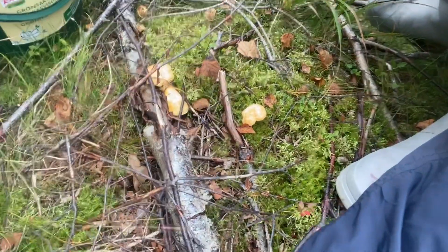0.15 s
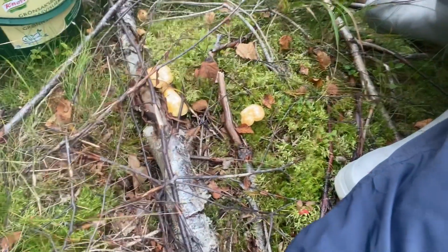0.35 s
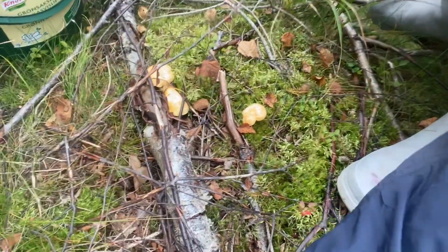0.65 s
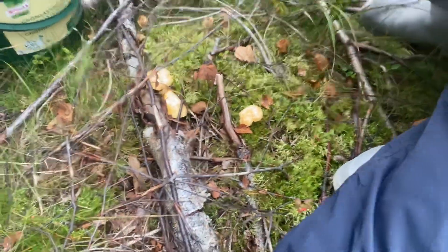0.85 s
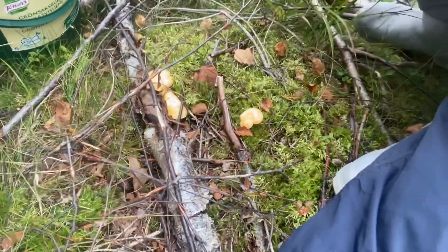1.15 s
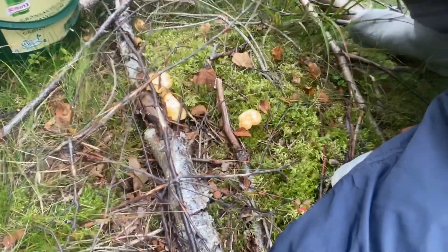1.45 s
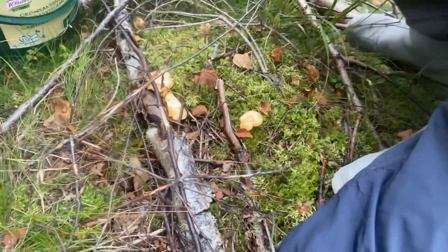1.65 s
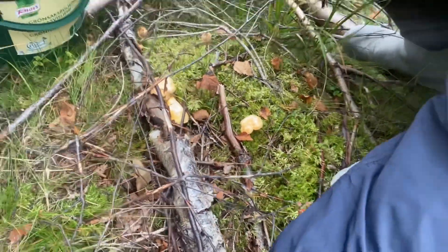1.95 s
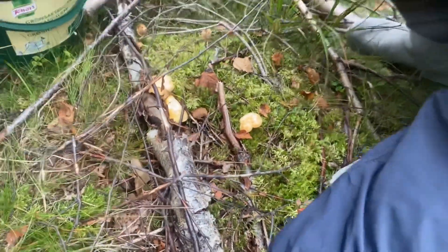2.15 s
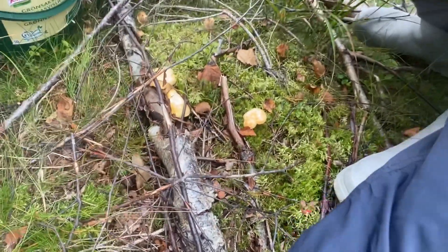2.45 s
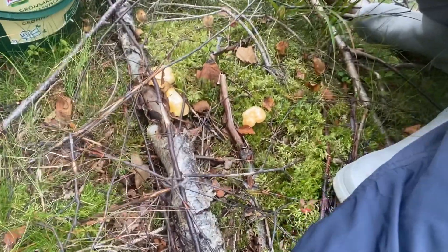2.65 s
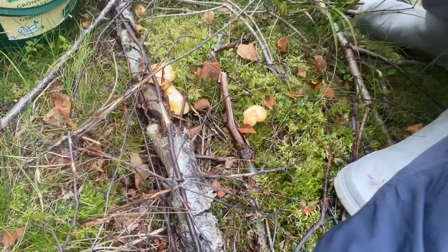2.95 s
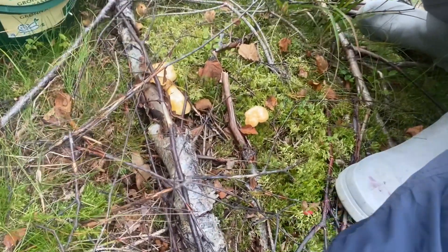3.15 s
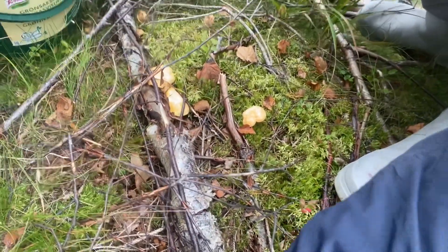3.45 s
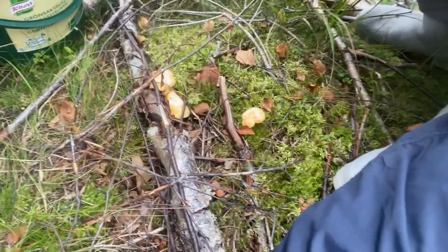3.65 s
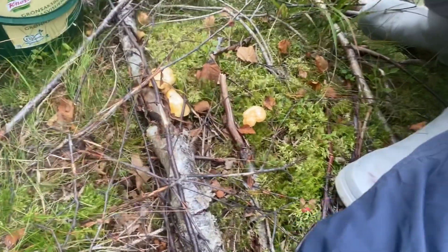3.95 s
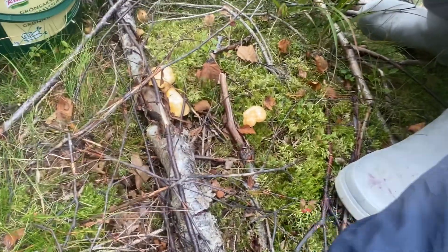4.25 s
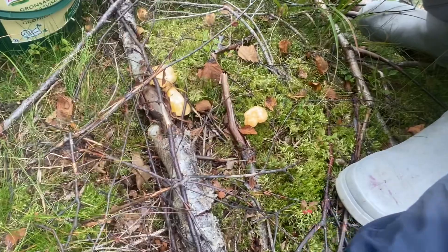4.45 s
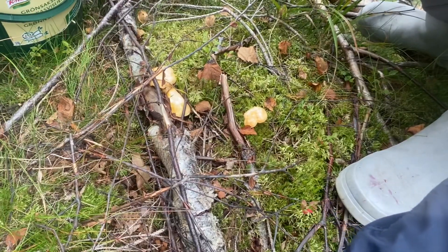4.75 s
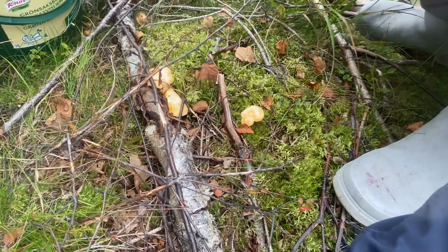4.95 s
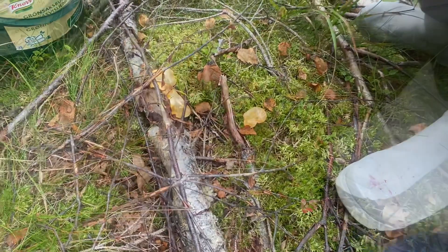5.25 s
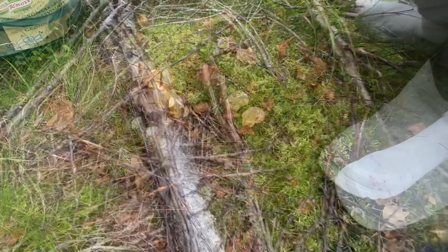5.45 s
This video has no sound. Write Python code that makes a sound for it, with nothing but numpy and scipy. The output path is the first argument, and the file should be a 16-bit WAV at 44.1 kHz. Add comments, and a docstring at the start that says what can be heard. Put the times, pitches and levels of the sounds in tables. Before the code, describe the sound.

Dry twigs snap and leaf litter rustles close by on a forest floor, with a tiny metal tinkle and soft low handling rumble.

```python
"""Twigs snap, dry litter and cloth rustle, a small metal tag tinkles, something taut creaks, and lows rumble.
The place is a mossy forest floor; someone crouches beside a hand-held stereo recorder with two microphone ports.
Shaped noise makes rustle, brushes, rumble and cracks; decaying sines make tag and creaks; thuds fall in pitch.
The ports hear each sound with a lag that changes with pitch."""
import sys
import numpy as np
from scipy import signal
from scipy.fft import rfft, irfft
from scipy.io import wavfile
from scipy.ndimage import uniform_filter1d

SR = 44100
rng = np.random.default_rng(int(sys.argv[2]) if len(sys.argv) > 2 else 0)


def store_wav(level_fs):
    """Save 16-bit WAV to argv[1]."""
    pcm = np.round(np.clip(np.atleast_2d(level_fs), -1, 1) * 32767)
    wavfile.write(sys.argv[1], SR, pcm.T.astype(np.int16))


N = 247296
TIME = np.arange(N) / SR
FREQ = np.fft.rfftfreq(N, 1 / SR)

# Breeze under the jolts, before gusts: (time [s], level [dB])
BREEZE = [(0, -56.5), (1.2, -50), (1.7, -67), (1.85, -68), (3.1, -67), (4.2, -69.5), (4.9, -56.5),
          (5.61, -69)]
BREEZE_GUST_DB = 3.5  # spread of the random gusts
# Jolts of the hand on the recorder: (time of height [s], level [dB], length [s])
JOLTS = [(0.33, -38.5, 0.041), (0.5, -42.5, 0.014), (0.66, -53, 0.055), (0.86, -38, 0.08),
         (1.1, -43.5, 0.16), (1.31, -35, 0.025), (1.45, -41, 0.04), (1.57, -38, 0.11), (1.68, -29.5, 0.015),
         (1.78, -40, 0.012), (2.51, -56.5, 0.074), (2.94, -50.5, 0.02), (3.23, -54.5, 0.037),
         (3.65, -61, 0.029), (3.81, -49.5, 0.034), (4.04, -53.5, 0.042), (4.29, -59, 0.061),
         (4.45, -38.5, 0.027), (4.68, -50, 0.028), (4.75, -48, 0.016), (4.84, -49, 0.058),
         (5.03, -50.5, 0.061), (5.24, -60, 0.038)]
JOLT_RISE_DB, JOLT_FALL_DB = 9.5, 13  # change within one length before and after the height

# Quiet litter between stirs: (time [s], crisp top [dB], scrape [dB], dull body [dB])
LITTER = [(0, -68, -64, -67.5), (1.3, -72, -76.5, -64.5), (1.8, -70.5, -70, -67),
          (2.798, -76.5, -75.5, -72.5), (3.899, -78, -91.5, -71.5), (4.399, -72.5, -69, -73.5),
          (4.569, -83.5, -90, -71), (5, -73.5, -86.5, -67.5), (5.61, -76, -68.5, -71)]
# Stirs of foot and cloth: (time of height [s], crisp top [dB], length [s], scrape relative to top [dB])
STIRS = [(0.0, -56.5, 0.11, 0.5), (0.124, -49, 0.096, -11.5), (0.247, -53.5, 0.082, -8.5),
         (0.48, -56.5, .1, -1.5), (0.667, -53, .1, -3.5), (0.804, -52.5, .1, -4.5),
         (1.058, -56.5, 0.13, 0.5), (1.226, -55.5, 0.083, -3.5), (1.466, -52, .1, 0.5),
         (1.653, -45.5, 0.057, -9.5), (1.777, -56.5, .07, -5), (2.147, -58, .18, -5.5),
         (2.485, -67, 0.15, 0.5), (3.127, -64.5, .25, -3.5), (3.318, -59.5, .06, -9.5),
         (3.467, -60.5, 0.1, -1.5), (3.754, -65, 0.12, -7), (3.994, -62.5, 0.082, -5.5),
         (4.262, -65, .16, -9), (4.432, -58, 0.036, -3.5), (4.723, -64, .11, -4), (5.061, -71, 0.17, 8.5)]
STIR_RISE_DB, STIR_FALL_DB = 12.5, 12.5  # change within one length before and after the height
STIR_BODY_DB = -5  # body relative to top
# Rustle colour before its bands are levelled: (frequency [Hz], relative density [dB])
RUSTLE_COLOUR = [(120, 7), (300, 10.5), (700, 8), (1200, 0.5), (3200, 0.5), (5500, 2), (9000, 5.5),
                 (12500, 3), (15500, 5), (16200, -42)]
# Bands of top, scrape and body, in that order: (low edge [Hz], high edge [Hz])
RUSTLE_BANDS = [(6400, 10500), (1800, 4200), (250, 650)]
# Leaves brushed aside: (time of height [s], level [dB], length [s], nominal centre [Hz])
BRUSHES = [(0.24, -53, 0.017, 964), (1.23, -57, 0.026, 1620), (2.172, -50, .005, 3320),
           (2.514, -54, 0.0099, 1740), (2.517, -63, 0.041, 895), (3.096, -54, 0.044, 5340),
           (4.658, -64, 0.04, 3100), (4.725, -60, 0.036, 3250)]

# Slips of a taut fibre: (time [s], level [dB])
CREAK_SLIPS = [(1.235, -47.5), (1.263, -53), (1.34, -48.5), (1.364, -49), (1.392, -48.5), (1.424, -48),
               (1.447, -49), (1.467, -52), (1.492, -51), (1.524, -50), (1.591, -51), (1.631, -47.5),
               (1.656, -45), (1.707, -49), (1.738, -56), (1.803, -52), (2.005, -58.5), (2.036, -57)]

# Touches of the tag: (time [s], level of each of five low rings [dB] in five columns,
# base level of the high rings [dB], time until cloth damps them [ms])
TAG_TOUCHES = [(0.482, -72, -67, -57, -67, -47.5, -65, 9.2), (0.6158, -39.5, -43, -41, -57, -54, -58, 14),
               (1.316, -50, -53, -65, -63, -61, -73, 3), (1.3717, -46, -61, -63, -70, -65, -66, 12),
               (1.4293, -40.5, -55, -61, -50, -52, -50, 14), (1.46, -57, -60, -66, -54, -58, -68, 18),
               (2.0362, -41.5, -54, -52, -53, -52, -57, 18), (2.054, -58, -59, -47, -57, -50, -55, 28),
               (2.076, -51, -39, -42, -50, -40.5, -63, 12), (2.1125, -42, -47, -38, -48, -48, -47.5, 7.9),
               (2.128, -45.5, -47, -54, -48, -57, -55, 11), (2.143, -49, -56, -56, -54, -49, -54, 37),
               (2.1695, -54, -50, -60, -47, -49.5, -56, 26), (2.2474, -60, -63, -46, -67, -70, -63, 23),
               (2.277, -51, -48, -49, -56, -56, -61, 16), (2.357, -46.5, -49, -66, -75, -75, -71, 5.3),
               (3.0224, -51, -45, -59, -62, -54, -73, 15), (3.043, -61, -57, -52, -43, -42, -58, 13),
               (3.0808, -46, -53, -55, -45, -45, -54, 22), (3.106, -58, -59, -59, -51, -60, -58, 15),
               (3.1217, -48.5, -59, -55, -58, -56, -58.5, 37), (3.147, -60, -63, -50, -60, -56, -56, 42),
               (3.188, -47, -69, -56, -64, -55, -61, 19), (3.217, -38, -46, -56, -53, -55, -58, 5.2),
               (3.228, -61, -57, -61, -53, -48, -60, 25), (3.2518, -30.5, -46, -53, -30, -49, -50, 18),
               (3.279, -32, -40, -46, -56, -59, -59, 8.6), (3.296, -30, -51, -57, -57, -56, -47.5, 11.6),
               (3.322, -35, -55, -60, -67, -63, -51, 8.5), (3.369, -46.5, -50, -60, -74, -79, -73, 5.3),
               (3.39, -48, -49, -62, -73, -74, -73, 5.6), (3.469, -56, -57, -72, -75, -64, -66, 13),
               (3.6165, -40.5, -45, -52, -73, -77, -84, 10.3), (3.707, -49, -61, -53, -59, -69, -72, 15),
               (3.7223, -39, -58, -55, -64, -52.5, -62.5, 9.8),
               (3.785, -37.5, -49, -62, -71, -67, -74, 6.1),
               (3.831, -53, -58, -49.5, -58, -59.5, -64.5, 13.5),
               (4.595, -74, -75, -72, -75, -55.5, -82, 6.6), (5.141, -65, -60, -70, -84, -87, -64, 17),
               (5.372, -71, -70, -82, -78, -65, -83, 12), (5.469, -59, -71, -76, -86, -84, -79, 7.6)]
# Free rings of the tag: (frequency [Hz], 60 dB decay [s])
TAG_RINGS = [(4592, 0.39), (4728, 0.21), (4895, 0.15), (5832, 0.049), (5946, 0.14), (11010, 0.082),
             (12700, 0.25), (13900, 0.12)]
TICK_DB, TICK_S = -7, 0.0025  # contact noise relative to the loudest ring, before its band; its decay
CHATTER_DB = -3  # gain of the faint touches
CHATTER_LIFT_DB = 11  # lift of chatter rings above 5400 Hz

# Twigs: (time [s], nominal crack [dB], wood relative to crack before a common lift [dB], wood pitch [Hz],
# nominal thud relative to crack [dB], length [ms])
TWIGS = [(0.0495, -25.5, -23, 2900, -24, 2.9), (0.118, -42, -22, 3000, -35, 1),
         (0.1404, -24, -39, 3260, -50, 1.2), (0.159, -37, -19, 3750, -18, 1.1),
         (0.2563, -12.5, -15.5, 1980, -26.5, 3.1), (0.2937, -40.5, -17, 2500, -14, 1.5),
         (0.3196, -36.5, -16, 1190, -23, 5.6), (0.3515, -40.5, -13, 1650, -29, 2.3),
         (0.543, -37, -21, 4000, -35, 2.2), (0.641, -43, -7, 3000, -30, 1),
         (0.6621, -21.5, -11, 4050, -40, 5.3), (0.7278, -25, -18, 3650, -51, 1.1),
         (0.7947, -23, -13, 1790, -29, 1.9), (0.8097, -23.5, -19, 2040, -23.5, 1.7),
         (0.8759, -38, -12, 2440, -28, 2), (0.901, -38.5, -21, 3500, -33, 1.5),
         (1.006, -31.5, -12, 2270, -23, 3), (1.0616, -19, -18, 3870, -49, 3.4),
         (1.0687, -30.5, -25, 3490, -43, 2.8), (1.5937, -31, -16, 1490, -19, 0.37),
         (1.6019, -29, -16.5, 3700, -23, 6.7), (1.6476, -35.5, -7, 3300, -11.5, 2.9),
         (1.6557, -25.5, -5, 3800, -21, 1.6), (1.714, -37, -13.5, 4050, -20, 1.8),
         (2.0319, -38, -13, 3880, -24.5, 5.6), (2.1383, -31.5, -35, 3560, -39, 1.1),
         (2.4716, -27.5, -18.5, 1470, -26, 0.59), (2.6653, -32.5, -14, 3960, -22.5, 4),
         (2.98, -39, -9.5, 1830, -19.5, 1.6), (3.3178, -31, -42, 4120, -19.5, 1.5),
         (3.3507, -39.5, -20, 4060, -25, 1.7), (3.46, -39.5, -15, 1720, -24, 1.2),
         (3.7371, -45, -2.5, 3500, -20, 1.1), (3.9773, -39, -9, 3540, -17, 7.3),
         (4.0174, -25, -13, 4100, -26, 2.7), (4.1754, -38, -13, 2880, -7.5, 4.3),
         (4.231, -50, -7, 3300, -30, 2.5), (4.2547, -27.5, -16, 2600, -21.5, 3),
         (4.3819, -52.5, -3.5, 3000, -27, 1.5), (4.4143, -26.5, -12, 3870, -23.5, 3.8),
         (4.4245, -47, -4.5, 3200, -20, 1.2), (4.4317, -44, -2.5, 3760, -17, 1),
         (4.479, -49.5, -8, 2700, -30, 1.5), (4.8941, -41, -13, 3000, -25, 1.5),
         (5.457, -48, -16, 1910, -10, 1.8)]
# Low rings of the limb under each break: (frequency [Hz], gain [dB], 60 dB decay [s])
LIMB_RINGS = [(726, -2.5, 0.38), (866, 17.5, 0.021), (410, 6.5, 0.069)]
WOOD_LIFT_DB = 8.5  # common lift of the wood
SMALL_SNAPS = 150  # faint twigs left to chance
SMALL_OVER_DB, SMALL_WOOD_DB = 3.5, 0.5  # base crack over the rustle, base wood relative to crack
SMALL_THUD_DB, SMALL_MS = -27, 0.95  # thud relative to crack; length
# The twig between these times [s] breaks right in front: its wood reaches the right port samples later.
HEAD_ON_FROM_S, HEAD_ON_TO_S, HEAD_ON_LAG_SAMPLES = .25, .26, 9

# Phase by which the left port leads the right: (frequency [Hz], lead [rad])
PORT_LEAD = [(0, 0), (1000, -.5), (4900, -8.8), (5900, -6.3), (17000, 5.6)]
# Likeness of the noise in the left and right channels: (frequency [Hz], likeness [0-1])
CHANNEL_LIKENESS = [(40, 0.58), (300, 0.56), (700, 0), (2000, 0.11), (6500, 0), (8500, 1), (15000, 1)]
PORT_BALANCE_DB = -1.5  # left relative to right
TOP_HZ = 16900  # upper limit of the recorder


def undb(db):
    """Turn decibels into an amplitude factor."""
    return 10 ** (np.asarray(db) / 20)


def unit(x):
    """Scale to an rms of 1."""
    return x / np.sqrt(np.mean(x ** 2))


def curves(table):
    """Draw each column of a table as a curve over time."""
    s, *columns = np.transpose(table)
    return [np.interp(TIME, s, column) for column in columns]


def over_freq(table):
    """Draw a table over log frequency."""
    hz, value = np.transpose(table)
    return np.interp(np.log(FREQ + 1), np.log(hz + 1), value)


def band(x, lo_hz, hi_hz):
    """Keep one band of the sound."""
    edges = [lo_hz, min(hi_hz, .45 * SR)]
    return signal.sosfilt(signal.butter(2, edges, "bandpass", fs=SR, output="sos"), x)


def ring(x, hz, t60):
    """One decaying mode; a unit impulse rings with an envelope starting near 1."""
    r, w = np.exp(-np.log(1000) / (t60 * SR)), 2 * np.pi * hz / SR
    return signal.lfilter([0, np.sin(w)], [1, -2 * r * np.cos(w), r * r], x)


def decay_sum(x, decay_s):
    """Each impulse leaves an exponential tail."""
    return signal.lfilter([1], [1, -np.exp(-1 / (decay_s * SR))], x)


def walk(rate):
    """Random levels held 1 / rate s and slewed; spread near 1."""
    k = int(SR / rate)
    held = np.repeat(rng.standard_normal(N // k + 1), k)
    return 1.116 * uniform_filter1d(uniform_filter1d(held, k), k)[:N]


def crackle(rate, depth, settle_s=0.0071):
    """Gain that jumps at random cracks of scattered size and settles within milliseconds; rms 1."""
    sizes = undb(2.84 * np.minimum(rng.exponential(size=N), 3.5))
    cracks = (rng.random(N) < rate / SR) * sizes
    return unit(1 + depth * decay_sum(cracks, max(settle_s, .0003)))


def swells(rows, rise_db, fall_db):
    """Power of humps (s, dB, length s) that climb to their height and sink again, straight in dB."""
    humps = []
    for s, db, length in rows:
        drop_db = np.where(TIME < s, rise_db * (s - TIME), fall_db * (TIME - s)) / max(length, .003)
        humps.append(undb(db - drop_db) ** 2)
    return humps


def add(track, s, piece):
    """Lay a piece into a track at a time in seconds."""
    i = int(s * SR)
    n = min(piece.shape[-1], N - i)
    track[..., i:i + n] += piece[..., :n]


def pair(x, other):
    """Two channels of noise with the listed likeness: each mixes a common and an opposite part."""
    like = np.clip(over_freq(CHANNEL_LIKENESS), 0, 1)
    common = rfft(x) * np.sqrt((1 + like) / 2)
    opposite = rfft(other) * np.sqrt((1 - like) / 2)
    return irfft(np.array([common + opposite, common - opposite]), N)


def rumble():
    """Breeze and handling: a low wobble of wandering pitch plus low noise, partly different in the channels."""
    swing = np.exp(2j * np.pi * np.cumsum(59 + 9 * walk(6)) / SR)
    slow = signal.butter(1, 20., fs=SR, output="sos")
    noise = rng.standard_normal((2, N)) + 1j * rng.standard_normal((2, N))
    drift = signal.sosfilt(slow, signal.sosfilt(slow, noise))
    # the fractional power evens out the drifting amplitude a little
    wobble = np.real(swing * drift / np.abs(drift) ** 0.22)
    upper = undb(-12.0) * unit(band(np.imag(noise), 92, 157))
    lower = undb(-7.0) * unit(band(np.real(noise), 35.3, 46.7))
    channels = unit(pair(*band(unit(wobble) + upper + lower, 46, 450)))
    breeze = undb(curves(BREEZE)[0] + BREEZE_GUST_DB * walk(5.9))
    jolt_power = sum(swells(JOLTS, JOLT_RISE_DB, JOLT_FALL_DB))
    return channels * np.sqrt(breeze ** 2 + jolt_power)


def rustle_levels():
    """Levels in dB of top, scrape and body: the quiet litter plus every stir."""
    stirs = np.array(swells([row[:3] for row in STIRS], STIR_RISE_DB, STIR_FALL_DB))
    top = stirs.sum(axis=0)
    scrape = undb(np.array(STIRS)[:, 3]) ** 2 @ stirs
    body = undb(STIR_BODY_DB) ** 2 * top
    return [10 * np.log10(undb(db) ** 2 + power) for db, power in zip(curves(LITTER), (top, scrape, body))]


def rustle():
    """Tiny leaf cracks of scattered size over a cloth hiss, swelling with each movement."""
    colour = undb(over_freq(RUSTLE_COLOUR)) * (FREQ > 100)
    grain = crackle(120, 0.7, 0.0016)
    sources = [irfft(rfft(rng.standard_normal(N) * grain) * colour, N) for _ in range(2)]
    spectrum = rfft(pair(*sources))
    gains_db = []
    for level_db, (lo, hi) in zip(rustle_levels(), RUSTLE_BANDS):
        inside = spectrum[0, (FREQ > lo) & (FREQ < hi)]
        gains_db.append(level_db - 10 * np.log10(2 * np.sum(np.abs(inside) ** 2) / N ** 2))
    top, scrape, body = gains_db
    slice_gains = (body, body, body, (body + scrape) / 2, scrape, (scrape + top) / 2, top)
    out = 0
    # octave slices that sum flat, each flickering and crackling alone, the dull ones less
    for lo, gain_db in zip(120 * 2 ** np.arange(7.), slice_gains):
        crisp = min(lo / 1500, 1) ** 0.41
        octaves_off = np.abs(np.log2(np.clip(FREQ, 170, 10800) / (lo * np.sqrt(2))))
        share = np.clip(1 - octaves_off, 0, 1)
        flicker_db = crisp * (2.36 * walk(20) + 2.72 * walk(7))
        gain = undb(gain_db + flicker_db) * crackle(60, 0.55 * crisp, 0.0022)
        out = out + irfft(spectrum * share, N) * gain
    return out * undb(2.06 * walk(30))


def brushes():
    """Leaves brushed aside: grainy noise swishes, each in a narrow band."""
    out = 0
    for power, (*_, hz) in zip(swells([row[:3] for row in BRUSHES], 12.5, 6.5), BRUSHES):
        grit = rng.standard_normal((2, N)) * crackle(304, 0.66)
        out = out + np.sqrt(power) * unit(band(grit + grit[0], hz / 1.26, hz * 1.104))
    return out


def creaks():
    """Each slip of the fibre swells and dies in a short hollow ring, with a duller one under it."""
    out, t = np.zeros(N), np.arange(1500) / SR
    detunes = 1 + .02 * rng.standard_normal(len(CREAK_SLIPS))
    for (s, db), detune in zip(CREAK_SLIPS, detunes):
        hollow = np.sin(2 * np.pi * 815 * detune * t)
        dull = undb(-6.5) * np.sin(2 * np.pi * 480 * detune * t)
        swell = np.e * t / 0.0028 * np.exp(-t / 0.0025)
        add(out, s - .002, undb(db) * swell * (hollow + dull))
    return out * undb(np.array([[-2.5], [2.5]]))


def chatter(touched):
    """Many faint random touches while the tag rings, too soft for the high rings."""
    touches = (rng.random((5, N)) < 130 / SR) * rng.standard_normal((5, N))
    soft = 0
    for (hz, t60), touch in zip(TAG_RINGS, touches):
        swing = decay_sum(np.abs(band(touched, hz - 400, hz + 400)), 0.014) / (0.01 * SR)
        soft = soft + ring(swing * touch, hz, 0.17 * t60) * undb(CHATTER_LIFT_DB * (hz > 5400))
    return undb(CHATTER_DB) * band(band(soft, 4300, 6300), 4300, 6300)


def tinkles():
    """Each touch strikes the tag's modes in its own mix and chokes the ring before it; cloth then damps it."""
    out, t = np.zeros(N), np.arange(6000) / SR
    chance = rng.standard_normal((len(TAG_TOUCHES), 3, len(TAG_RINGS)))
    hz, t60 = np.transpose(TAG_RINGS)
    ticks = rng.standard_normal((len(TAG_TOUCHES), len(t))) * np.exp(-t / TICK_S)
    for (s, *low_db, high_db, ms), (mix, detune, turn), tick in zip(TAG_TOUCHES, chance, ticks):
        highs_db = high_db + np.array([0, -5, -9]) + 4.5 * mix[5:]
        gains = undb(np.r_[low_db, highs_db])
        mode_hz = hz * (1 + 0.0032 * detune)
        modes = np.sin(2 * np.pi * mode_hz[:, None] * t + 3 * turn[:, None]) * 1000. ** (-t / t60[:, None])
        damping = 0.11 + 1.027 / (1 + (1000 * t / max(ms, 2)) ** 6)
        out[int(s * SR):] *= .6  # choke what still rings
        add(out, s, gains @ modes * np.minimum(t / .0015, 1) * damping)
        loudest_hz = hz[gains.argmax()]
        add(out, s, undb(TICK_DB) * gains.max() * band(tick, loudest_hz / 1.1, loudest_hz * 1.13))
    out = out + chatter(out)
    # the tag rubs on cloth, so its ring flutters
    return out * undb(2.9 * walk(220) + np.array([[-1.5], [1.5]]))


def small_snaps():
    """Faint twigs that give at random, more often and louder while the litter is stirred; bright to woody."""
    level_db = rustle_levels()[0]
    odds = np.cumsum(undb(level_db / 2))
    when, size, pitch, dull = rng.random((SMALL_SNAPS, 4)).T
    at = np.searchsorted(odds, when * odds[-1])
    twigs = []
    for i, a, b, d in zip(at, size, pitch, dull):
        crack_db = level_db[i] + SMALL_OVER_DB + 9 * (a * a - .3) - 6 * d
        wood_db = SMALL_WOOD_DB + 12 * (d - .5)
        twigs.append((i / SR * .999, crack_db, wood_db, 1200 * 3.8 ** b, SMALL_THUD_DB, SMALL_MS))
    return twigs


def snaps():
    """Fibres break in noise bursts: bright crack, wood just after, then a thud that sinks into the moss."""
    out, blows, t = np.zeros((2, N)), np.zeros(N), np.arange(3000) / SR
    twigs = [*TWIGS, *small_snaps()]
    noise = rng.standard_normal((len(twigs), 3, len(t)))
    opposite = np.array([[1], [-1]])
    sinking_hz = 200 + 650 * np.exp(-t / 0.0019)
    thud_fade = .6 * np.exp(-t / 0.003) + 0.5 * np.exp(-(t / 0.024) ** 2)
    thud = np.sin(2 * np.pi * np.cumsum(sinking_hz) / SR) * thud_fade
    rise = np.minimum(t / 0.00087, 1) ** 3  # a few fibres give first
    splinters = .18 * np.exp(-t / .008)  # settling tail
    for (s, db, wood_db, wood_hz, thud_db, ms), (a, b, c) in zip(twigs, noise):
        length_s = max(ms, .3) / 1000
        shape = rise * (np.exp(-(np.maximum(t - .0012, 0) / length_s) ** 2) + splinters)
        brittle = shape ** 1.4  # the treble is briefer than the wood
        crack = band((a + 0.34 * c * opposite) * brittle, 6260, 14500)
        # the wood differs partly between the ports
        wood = band((b + .5 * c * opposite) * shape, wood_hz / 1.88, wood_hz * 1.44)
        add(out, max(s - .0006, 0), undb(db + np.array([[2.3], [.7]])) * crack / np.abs(crack).max())
        if HEAD_ON_FROM_S < s < HEAD_ON_TO_S:
            wood = np.array([wood[0], np.roll(wood[0], HEAD_ON_LAG_SAMPLES)])
        add(out, s, undb(db + wood_db + WOOD_LIFT_DB) * wood / np.abs(wood).max())
        add(out, s + 0.0011, undb(db + thud_db + np.array([[2.0], [5.0]])) * thud)
        add(blows, s + 0.0015, undb(2.1 * (db + wood_db)) * np.ones(4))
    limb = sum(undb(db) * ring(blows, hz, t60) for hz, db, t60 in LIMB_RINGS)
    return out + limb * undb(np.array([[-2.0], [2.0]]))


def scene():
    """Sum the layers from the background to the snapping twigs."""
    return rumble() + rustle() + brushes() + creaks() + tinkles() + snaps()


def record(dry):
    """The ports shift left against right in phase and level; the recorder cuts the top."""
    lead = np.interp(FREQ, *np.transpose(PORT_LEAD))
    half = np.exp(.5j * lead) * undb(PORT_BALANCE_DB / 2)  # each port takes half the shift
    ports = irfft(rfft(dry) * np.array([half, 1 / half]), N)
    return signal.sosfilt(signal.ellip(10, .2, 80, TOP_HZ, fs=SR, output="sos"), ports)


dry = scene()
out = record(dry)
store_wav(out)
```